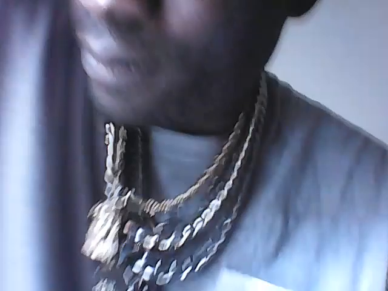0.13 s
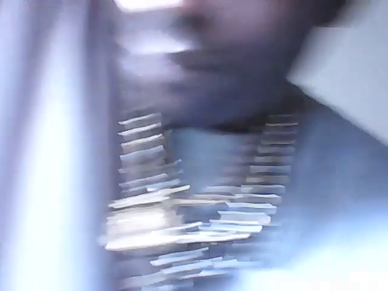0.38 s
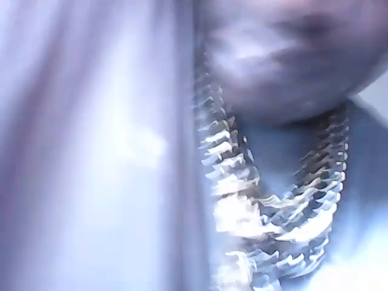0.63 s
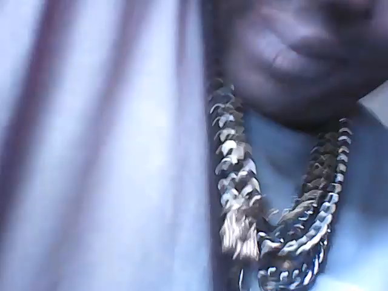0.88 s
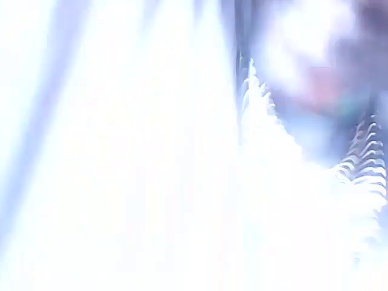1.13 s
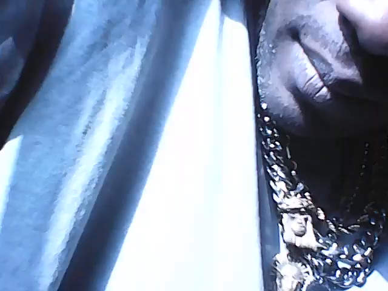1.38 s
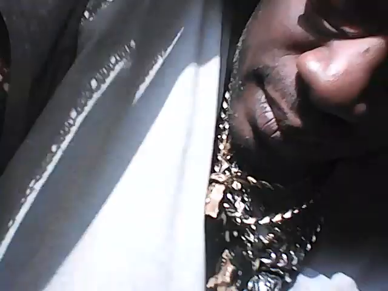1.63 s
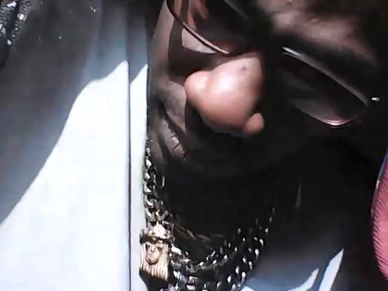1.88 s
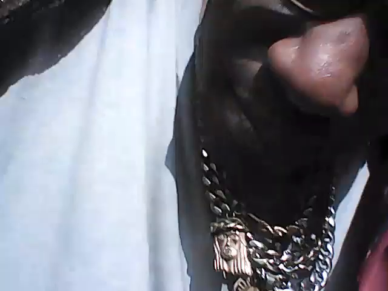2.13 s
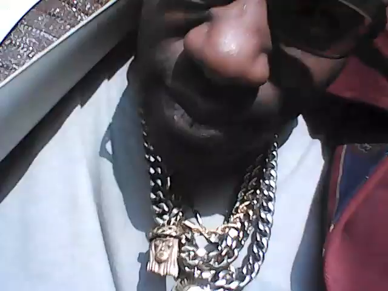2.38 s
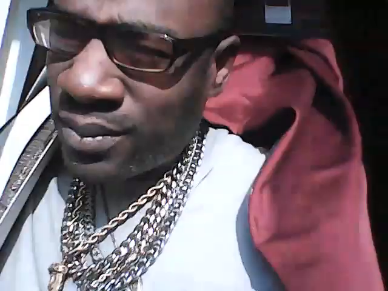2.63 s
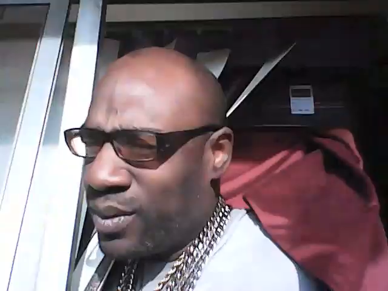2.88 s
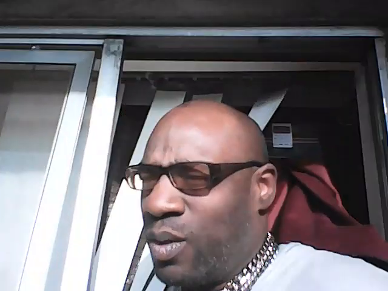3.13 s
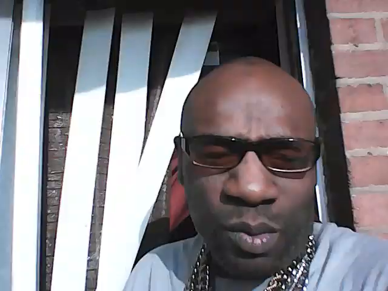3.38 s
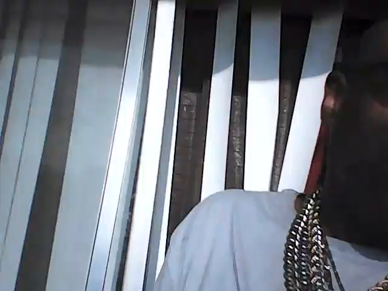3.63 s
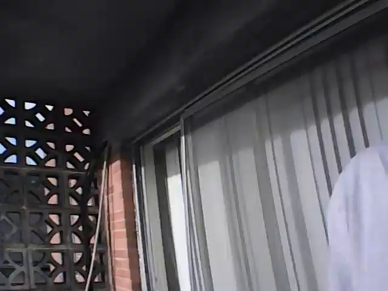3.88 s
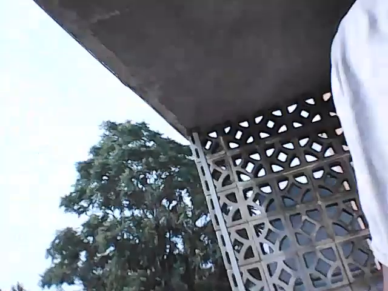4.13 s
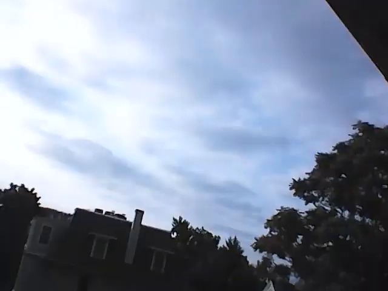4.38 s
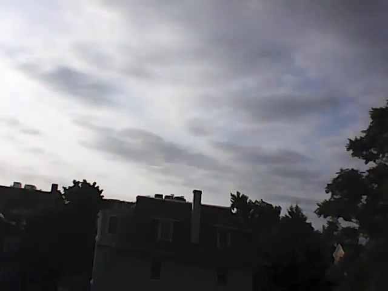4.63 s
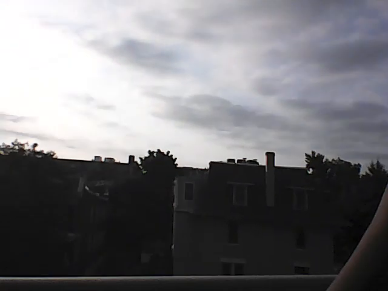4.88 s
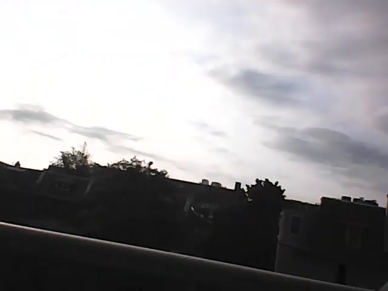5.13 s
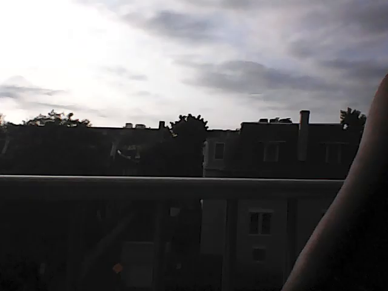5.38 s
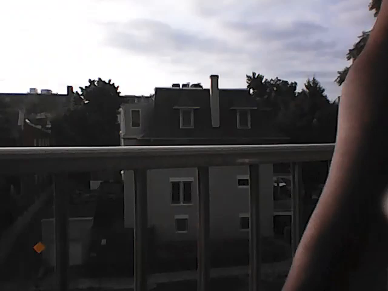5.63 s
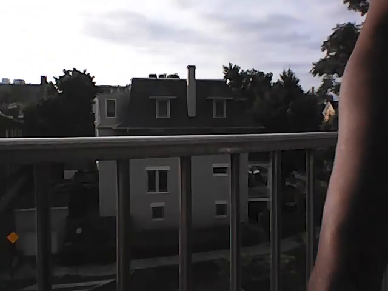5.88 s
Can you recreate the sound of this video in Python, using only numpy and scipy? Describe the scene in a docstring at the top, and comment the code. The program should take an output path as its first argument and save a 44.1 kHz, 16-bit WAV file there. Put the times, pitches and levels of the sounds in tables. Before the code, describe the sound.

A cheap hand-held microphone, nearly mono, carries low hiss and a faint high whine throughout. From 0 s cloth rubs and plastic blinds slide; two hard clacks and a strong handling thump strike at 0.35-0.45 s. Smaller rattles follow, then a dense, bright, scraping clatter of slats swells from about 0.95 to 1.5 s with bumps, thinning by 1.8 s. From 2 s it is nearly quiet: tiny crisp chain ticks cluster around 2.6 s, with soft scuffs, thin wavering hums and a touch more echo around 3 s. Light bumps come at 3.45-3.65 s, scuffing near 3.95 s. A sharp click at 4.13 s leads into a heavy, deep knock at 4.22 s. Quiet fine scuffing follows at 4.5 s. A rough cloth-and-slat bump comes at 5.36 s, then narrow rubbing hums, clacks at 5.7 s, a very hard short clack at 5.79 s, and a last knock at 5.94 s, ending near 6 s.

```python
"""Someone pushes through hanging plastic blinds onto a balcony, holding a small camera; hiss and a faint whine run on.
Up to 2 s cloth and slats brush (rough noise), slats clack (struck modes), thumps come through the hand (sagging sines).
From 2 s fine ticks of neck chains, soft scuffs and thin hums (narrow noise) follow, with more echo around 3 s.
A heavy knock lands near 4.2 s; scuffs return, then hums and hard clacks from 5.1 s to the end. Almost mono."""
import sys
import numpy as np
from scipy import signal
from scipy.fft import rfft, irfft
from scipy.io import wavfile
from scipy.ndimage import uniform_filter1d

SR = 44100
rng = np.random.default_rng(int(sys.argv[2]) if len(sys.argv) > 2 else 0)


def dump(signal):
    """Clip the signal to [-1, 1] and save it as 16-bit WAV at the path in sys.argv[1]."""
    limited = np.clip(np.atleast_2d(signal).T, -1, 1)
    pcm = np.round(limited * 32767).astype(np.int16)
    wavfile.write(sys.argv[1], SR, pcm)


N = 267246


def gain_of(db):
    """Decibels to an amplitude factor."""
    return 10 ** (np.asarray(db) / 20)


def evened(x):
    """Scales to rms 1."""
    return x / np.sqrt(np.mean(x ** 2) + 1e-20)


def read(points, hz):
    """Reads a curve on a log-frequency axis."""
    f, value = np.transpose(points)
    return np.interp(np.log(hz + 1), np.log(f + 1), value)


def add(mix, start_s, sound):
    """Mixes a sound in at a time."""
    part = mix[round(start_s * SR):][:len(sound)]
    part += sound[:len(part)]


def patchy(x, points, patchy_db, size=512):
    """Colours a signal at unchanged overall level and lets narrow bands swell and fade at random."""
    overlap = 3 * size // 4
    hz, t, z = signal.stft(x, SR, nperseg=size, noverlap=overlap)
    colour_db = read(points, hz)
    spots = rng.standard_normal(z.shape[::-1]).T
    spots = uniform_filter1d(spots, size=3, axis=0)
    spots = evened(uniform_filter1d(spots, size=24, axis=1))
    depth_db = np.interp(t, np.arange(N) / SR, patchy_db * np.ones(N))
    power_offset_db = depth_db ** 2 * np.log(10) / 20  # keeps the mean power
    z = z * gain_of(colour_db[:, None] + depth_db * spots - power_offset_db)
    coloured = signal.istft(z, SR, nperseg=size, noverlap=overlap)[1][:N]
    return coloured / np.sqrt(np.mean(gain_of(colour_db) ** 2))


# Hiss spectrum. Each row: frequency in Hz, relative density in dB per Hz.
HISS_SPECTRUM = [(18, -46.5), (30, -36), (101, -5.5), (179, -21.5), (303, -18), (465, -25.5), (1650, -32),
                 (1990, -34.5), (8140, -35.5), (8950, -57), (11600, -70), (19700, -120)]
HISS_DB, HISS_PATCHY_DB = -64, 4.5
WHINE_HZ, WHINE_DB = 8050, -84


def microphone_floor():
    """Slightly uneven hiss and a thin steady whine of the electronics."""
    whine = gain_of(WHINE_DB) * np.sin(2 * np.pi * WHINE_HZ * np.arange(N) / SR)
    hiss = patchy(rng.standard_normal(N), HISS_SPECTRUM, HISS_PATCHY_DB, size=1024)
    return gain_of(HISS_DB) * hiss + whine


# Movements. Each row: time of full strength in s, swell in s, hold in s, base fade in dB per s,
# then full levels in dB of cloth, slats, fine scuff and handling rumble.
MOVEMENTS = [ (0.13, 0.13, 0.13, 101, -48, -33, -41, -54.5),
             (0.239, 0.045, 0.14, 196, -34.5, -32, -35.5, -43),
             (0.353, 0.033, .005, 243, -36, -49, -46.5, -31),
             (0.467, 0.023, 0.03, 155, -29, -35, -45.5, -33),
             (0.635, .02, 0.2, 296, -58, -50.5, -49.5, -74),
             (0.775, 0.035, 0.0073, 305.5, -37.5, -40, -52.5, -41.5),
             (0.819, .01, 0.006, 170, -42, -34.5, -44, -41.5),
             (0.965, 0.1, 0.17, 53.5, -36, -21.5, -31, -33.5),
             (1.264, 0.17, 0.03, 148.5, -30.5, -31.5, -39, -31),
             (1.414, 0.036, 0.003, 120, -33, -48, -40.5, -29.5),
             (1.561, .04, 0.12, 295, -44, -41.5, -47.5, -41),
             (1.741, 0.053, .005, 98, -51.5, -77, -51, -35),
             (1.93, 0.065, 0.052, 198.5, -59, -71, -71.5, -51.5),
             (2.156, .07, 0.018, 123.5, -68.5, -70, -64, -57),
             (2.466, 0.031, .005, 124, -78, -62, -65, -64),
             (2.597, 0.022, 0.016, 84.5, -73.5, -63.5, -59.5, -66.5),
             (2.725, 0.049, 0.095, 150, -55.5, -64.5, -63, -65.5),
             (2.903, 0.019, 0.25, 295.5, -55, -68, -84, -76),
             (3.091, .02, 0.0067, 208, -42.5, -51.5, -76.5, -66),
             (3.172, 0.068, 0.11, 105, -61, -70, -83.5, -78),
             (3.457, 0.12, 0.027, 248.5, -53.5, -63, -50, -50),
             (3.641, 0.13, 0.22, 101.5, -77, -84.5, -96, -53),
             (3.934, 0.051, 0.14, 301.5, -39, -48.5, -46.5, -39),
             (4.134, 0.066, 0.0067, 403.5, -40.5, -42, -33, -22),
             (4.244, 0.023, 0.0042, 245, -45, -49.5, -50.5, -35.5),
             (4.578, 0.4, 0.038, 285, -83, -75, -53.5, -68),
             (4.616, 0.07, 0.068, 346, -74, -67.5, -41.5, -67),
             (4.663, 0.038, 0.021, 240, -47, -51, -55.5, -43),
             (5.017, 0.062, .005, 155.5, -73, -76, -82, -59),
             (5.101, 0.17, 0.06, 196, -64, -49, -67.5, -77),
             (5.372, 0.039, 0.0056, 243.5, -27, -40.5, -44, -26),
             (5.553, 0.016, 0.23, 300, -50.5, -47.5, -55.5, -45),
             (5.764, .015, 0.056, 302, -42.5, -42.5, -49, -34),
             (5.827, 0.014, 0.13, 200, -48, -56, -63.5, -49),
             (5.945, 0.031, 0.062, 348, -39.5, -43.5, -42, -43.5)]
# Factor on the base fade for cloth, slats, scuff and rumble.
FADE_FACTORS = [1.17, 1.033, 1.17, 0.83]
SWELL_DB = 38.5  # rise over the swell time


def movement(column):
    """Level in dB of one layer: the movements' swells, holds and fades add up in power."""
    t = np.arange(0, N + 64, 64) / SR
    power = 1e-12
    for full_s, swell_s, hold_s, fade_db_per_s, *levels_db in MOVEMENTS:
        before_s = np.maximum(full_s - t, 0)
        after_s = np.maximum(t - full_s - abs(hold_s), 0)
        rise_db = SWELL_DB * before_s / max(swell_s, .004)
        fall_db = FADE_FACTORS[column] * fade_db_per_s * after_s
        db = levels_db[column] - rise_db - fall_db
        power = power + gain_of(np.maximum(db, -200)) ** 2
    return np.interp(np.arange(N) / SR, t, 10 * np.log10(power))


def grit(per_s, spread_db, smooth):
    """Dense tiny contacts of unequal size over smooth rubbing."""
    hit = rng.random(N) < per_s / SR
    size = np.minimum(rng.exponential(1, N), 4)
    noise = rng.standard_normal(N)
    bursts = signal.lfilter([1], [1, -.985], hit * gain_of(spread_db * size))
    return noise * (smooth + evened(bursts))


# Spectra of cloth, brushed slats, upper slat modes under hard brushing, fine scuff and handling rumble.
# Each row: frequency in Hz, relative density in dB per Hz.
CLOTH_SPECTRUM = [(250, -23), (420, 3), (700, 5), (1100, 3.5), (1600, -23.5), (2500, -42.5)]
SLIDE_SPECTRUM = [(700, -38.5), (1150, -9.5), (1700, -2), (2300, -5), (2600, -5), (3100, -8.5),
                  (3800, -37.5)]
HARD_SPECTRUM = [(2200, -36), (3000, 3), (4300, 6.5), (5500, -30)]
SCUFF_SPECTRUM = [(3000, -47), (4300, -14.5), (4950, -6), (5500, 1), (6000, -3), (7500, -2), (8400, -11.5),
                  (9200, -39.5)]
RUMBLE_SPECTRUM = [(25, -46.5), (55, -33), (90, -24.5), (130, 2.5), (200, -1.5), (330, -5.5), (550, -45.5)]
HARD_GROWTH, HARD_EVEN_DB = 1.45, -8  # dB per dB of slat level; level where both are equal


def brushing():
    """Cloth drags, slats slide over each other, soles and links scuff, the hand shifts on the housing."""
    cloth_db, slats_db, scuff_db, rumble_db = map(movement, range(len(FADE_FACTORS)))
    # many contacts at once even out; a few leave single bands
    few = np.clip((-22 - slats_db) / 30, .3, 1)
    contacts = evened(grit(400, 2.4, 1.9))
    out = gain_of(cloth_db) * patchy(contacts, CLOTH_SPECTRUM, 5.0 * few, size=1024)
    out += gain_of(slats_db) * patchy(contacts, SLIDE_SPECTRUM, 5.5 * few, size=1024)
    hard_db = HARD_GROWTH * (slats_db - HARD_EVEN_DB) + HARD_EVEN_DB
    out += gain_of(hard_db) * patchy(contacts, HARD_SPECTRUM, 5.5 * few)
    fine = evened(contacts + 1.1 * evened(grit(200, 6.3, 1.0)))
    spotty_db = 7.0 * np.clip((-28 - scuff_db) / 30, .3, 1)
    out += gain_of(scuff_db) * patchy(fine, SCUFF_SPECTRUM, spotty_db)
    shake = patchy(rng.standard_normal(N), RUMBLE_SPECTRUM, 2.5, size=1024)
    # divided by its own short-term level, so the rumble stays even
    local_power = abs(uniform_filter1d(shake ** 2, size=3000))
    shake = shake / np.sqrt(local_power + 1e-9)
    return out, gain_of(rumble_db) * shake


# Echo decay. Each row: frequency in Hz, t60 in s.
WALL_DECAY = [(200, 0.1), (1000, 0.047), (4000, 0.15), (9000, 0.18)]


def walls(x):
    """Sparse echoes of random sign, each band dying at its own speed."""
    taps = np.zeros((2, SR // 2))
    slots = np.arange(300, SR // 2 - 20, 20)
    at = slots + rng.integers(0, 20, (2, len(slots)))
    np.put_along_axis(taps, at, rng.choice([-1., 1.], at.shape), 1)
    hz, t, z = signal.stft(taps, SR, nperseg=256)
    decay_db = -60 * t / read(WALL_DECAY, hz)[:, None]
    tail = signal.istft(z * gain_of(decay_db), SR, nperseg=256)[1]
    return signal.fftconvolve(x[None], tail / np.linalg.norm(tail[0]), axes=1)[:, :N]


# Modes of a struck slat. Each row: nominal frequency in Hz, nominal level in dB, sharpness (higher is narrower).
SLAT_MODES = [(546, -9, 3.9), (750, 7.5, 2.88), (920, 2.5, 1.1), (1112, 14, 1.6), (1423, -0.5, 0.29),
              (1810, 7, 0.6), (2120, 4.5, 0.21), (2614, 2.5, 0.1), (2730, 3, 0.45), (3808, 15.5, 3.8),
              (3800, 11, 0.22), (4740, 0.5, 1.6), (4700, 14.5, 1.7), (5250, 17.5, 2.9), (6240, 26.5, 1.7),
              (7040, 0.5, 0.59)]
# Clacks and ticks. Each row: time in s, early rms level in dB, favoured ring in Hz,
# fall away from that ring in dB per octave, t60 in s.
CLACK_EVENTS = [(.243, -38, 745, 17, 0.071), (.348, -12.5, 1090, 5.5, 0.05), (.441, -12.5, 773, 8, 0.072),
                (.477, -21, 744, 12, 0.057), (.567, -30.5, 760, 22, 0.063), (.613, -29, 7100, 23, 0.048),
                (.653, -41.5, 6500, 18, .04), (.718, -30, 5600, 7, 0.028), (.764, -28, 1750, 7.5, 0.14),
                (.784, -30.5, 724, 26, 0.1), (.827, -30.5, 1730, 8, 0.031), (.851, -36.5, 6060, 8, 0.018),
                (.968, -19.5, 1560, 6.5, 0.13), (1.012, -25, 2130, 5, 0.027), (1.118, -16.5, 2300, 6, 0.14),
                (1.231, -21, 2120, 4.5, 0.12), (1.392, -20.5, 945, 3, 0.1), (1.428, -28, 1090, 9, 0.012),
                (1.452, -23, 1436, 21, 0.038), (1.346, -34, 5440, 10, .025), (1.469, -28, 1310, 0, 0.015),
                (1.544, -33, 1440, 5, 0.017), (1.572, -27, 563, 7, 0.066), (1.615, -31.5, 7000, 13, 0.06),
                (1.698, -36, 870, 9, 0.14), (1.743, -30, 7550, 50, 0.016), (1.762, -41, 684, 6.5, 0.055),
                (1.948, -43.5, 970, 18, 0.061), (1.983, -55.5, 6640, 8, .056),
                (1.875, -59, 7520, 14, 0.021), (1.916, -55.5, 4000, 6.5, .025),
                (2.331, -63, 4000, -0.5, 0.033), (2.444, -47, 2600, 25, 0.085),
                (2.567, -30.5, 5720, 27, 0.01), (2.572, -31.5, 5480, 19, 0.023),
                (2.577, -44, 5500, 11, .03), (2.6, -37.5, 5680, 16, 0.033), (2.621, -36.5, 6560, 25, .051),
                (2.638, -38, 4850, 30, 0.032), (2.69, -52, 6000, 11, 0.023), (2.719, -49.5, 1670, 7, 0.036),
                (2.756, -59, 7000, 12, .03), (2.792, -53, 880, -5, 0.034), (2.901, -54, 890, 12, 0.053),
                (2.982, -51.5, 570, 10.5, 0.077), (3.022, -50.5, 1360, 12, 0.036),
                (3.087, -55, 490, 10, 0.07), (3.285, -55, 6540, 11.5, .04),
                (3.423, -48.5, 6400, 12.5, 0.03), (3.444, -57, 507, 3.5, 0.057),
                (3.479, -51, 6200, 0, .054), (3.526, -54, 6860, -4, 0.031), (3.567, -52, 6500, 8.5, 0.036),
                (4.11, -33, 586, 7, 0.051), (4.129, -19.5, 6130, -3.5, 0.019),
                (4.154, -28, 580, 5.5, 0.027), (4.221, -44.5, 500, 5.5, 0.015),
                (4.246, -55, 900, -1.5, 0.065), (4.267, -54, 4500, 0.5, .02),
                (4.92, -61, 5500, 10.5, 0.059), (5.104, -48.5, 3700, 16.5, 0.18),
                (5.151, -43.5, 2610, 14, .051), (5.354, -23, 1002, 12, 0.11), (5.375, -31, 600, 2.5, 0.031),
                (5.439, -53, 960, -2, .035), (5.568, -34, 900, 10.5, 0.12), (5.648, -41, 1160, 0.5, 0.14),
                (5.705, -27.5, 1060, 16, 0.051), (5.734, -20, 760, 6, 0.047),
                (5.794, -8.5, 1200, 6.5, 0.018), (5.809, -18.5, 490, 14, 0.022),
                (5.938, -23.5, 1120, 9, 0.052), (5.975, -58, 5950, -1, 0.076)]
THIN_HZ, BELOW_SHARE = 480, .9  # slats radiate little below this; fall below the ring against above


def clacks():
    """Each blow is a crack of contact noise that also shakes the damped slat modes, coloured by where it lands."""
    out, t = np.zeros(N), np.arange(SR // 6) / SR
    bins = np.fft.rfftfreq(len(t), 1 / SR)
    hz, db, sharp = np.array(SLAT_MODES).T[:, :, None]
    luck = rng.standard_normal((len(CLACK_EVENTS), 2, len(SLAT_MODES), 1))
    noise = rng.standard_normal((len(CLACK_EVENTS), len(t)))
    for (start_s, level_db, ring_hz, fall_db, t60_s), (tune, share), jolt in zip(CLACK_EVENTS, luck, noise):
        t60_s = max(t60_s, .006)
        octaves = np.log2((bins + 1) / ring_hz)
        away = np.sqrt(octaves ** 2 + 0.14) * np.where(octaves < 0, BELOW_SHARE, 1)
        thin_db = 8.3 * np.maximum(np.log2(THIN_HZ / (bins + 1)), 0)
        colour_db = -fall_db * away - thin_db
        # no two slats are cut or held alike: pitch and share of each mode vary
        detune = (bins - hz * (1 + 0.11 * tune)) / (.03 * hz / sharp + 40)
        modes = (gain_of(db + 2.0 * share) / (1 + 1j * detune)).sum(0)
        # the struck spot favours one ring
        modes += 13.0 / (1 + 1j * (bins - ring_hz) / (0.031 * ring_hz + 25))
        blow = jolt * (1 - np.exp(-t / 0.00066)) * gain_of(-60 * t / t60_s)
        blow[30] += 3.5 * (0.073 / t60_s) ** 0.28  # sharp contact, harder in short blows
        sound = irfft(rfft(blow) * (modes + 2.2) * gain_of(colour_db), len(t))
        # 1 ms of room for the taper, taken back in the start time
        sound = np.roll(sound, 44) * signal.windows.tukey(len(t), .012)
        early_rms = np.sqrt(np.mean(sound[:300] ** 2))
        add(out, start_s - .001, gain_of(level_db) * sound / early_rms)
    return out


# Steps and knocks. Each row: time in s, peak of the envelope in dB, starting pitch in Hz, t60 in s (20 ms at least).
THUMP_EVENTS = [(.349, -42, 426, 0.2), (0.434, -10.5, 325, 0.043), (0.788, -34.5, 316, 0.15),
                (1.01, -15, 200, 0.037), (1.232, -48, 220, .037), (1.562, -29.5, 172, 0.13),
                (1.65, -31.5, 148, .11), (1.743, -21, 116.6, 0.18), (2.131, -37.5, 131.7, 0.29),
                (3.451, -33.5, 501, 0.11), (3.475, -31.5, 407, 0.078), (3.577, -39, 130, 0.15),
                (3.633, -20, 164.6, 0.041), (3.661, -29, 110, .052), (3.761, -33, 210.5, 0.12),
                (4.109, -21, 161, 0.039), (4.126, -16, 251, .03), (4.152, -37, 241, .031),
                (4.215, -5, 121.3, 0.054), (4.243, -13, 113, 0.021), (4.283, -30, 107, .027),
                (4.793, -44, 131.8, .07), (5.353, -22, 147, 0.053), (5.384, -28.5, 190, 0.11),
                (5.738, -25, 108, 0.051), (5.793, -10.5, 145, .04), (5.805, -11, 256, 0.016),
                (5.941, -24, 142, 0.13)]
THUMP_LAG_S, THUMP_RISE_S, THUMP_SAG_PER_S = .004, 0.0028, 2.1


def thumps():
    """A few soft cycles of the housing for each step or knock, sagging in pitch."""
    out, t = np.zeros(N), np.arange(SR // 3) / SR
    for start_s, peak_db, hz, t60_s in THUMP_EVENTS:
        shape = (1 - np.exp(-t / THUMP_RISE_S)) ** 2 * gain_of(-60 * t / max(t60_s, .02))
        turns = hz * np.cumsum(np.exp(-THUMP_SAG_PER_S * t)) / SR
        cycles = -np.sin(2 * np.pi * turns)
        add(out, start_s + THUMP_LAG_S, gain_of(peak_db) * shape / shape.max() * cycles)
    return out


# A loose slat or rail rubbed in one band. Each row: start in s, length in s, centre in Hz,
# rms level in dB before the fade.
HUM_EVENTS = [(0.57, 0.05, 5050, -47.5), (2.445, 0.087, 2040, -56), (2.445, 0.076, 2493, -49.5),
              (2.445, 0.052, 3000, -47), (2.6, 0.14, 3400, -53), (2.6, 0.17, 4600, -56),
              (2.77, .11, 3490, -61), (2.72, 0.042, 1910, -50.5), (2.71, 0.032, 1287, -50),
              (2.798, 0.027, 876, -44.5), (2.906, 0.037, 2190, -53), (2.977, 0.092, 2044, -53),
              (3.02, 0.037, 1370, -50), (3.09, 0.02, 4310, -58), (3.423, 0.084, 1533, -53.5),
              (3.438, 0.068, 2035, -52), (3.474, 0.1, 5100, -58), (4.5, 0.32, 5970, -55.5),
              (5.08, 0.13, 2513, -50.5), (5.363, 0.16, 315, -41), (5.562, 0.28, 1068, -41),
              (5.572, 0.14, 303.5, -45), (5.607, 0.28, 2940, -50)]
HUM_WIDTH_HZ, HUM_WIDTH_SHARE = 45, .025  # bandwidth: fixed part, plus a share of the centre


def hums():
    """Narrow wavering bands: smoothed noise shifted up to each pitch, quick to start and fading."""
    out = np.zeros(N)
    noise = rng.standard_normal((len(HUM_EVENTS), 2, SR // 3))
    for (start_s, length_s, hz, level_db), (a, b) in zip(HUM_EVENTS, noise):
        t = np.arange(min(round(length_s * SR), len(a))) / SR
        r = np.exp(-np.pi * (HUM_WIDTH_HZ + HUM_WIDTH_SHARE * hz) / SR)
        waver = signal.lfilter([1], [1, -2 * r, r ** 2], a + 1j * b)[-len(t):]
        band = evened((waver * np.exp(2j * np.pi * hz * t)).real)
        shape = signal.windows.tukey(len(t), .2) * gain_of(-8.0 * t / length_s)
        add(out, start_s, gain_of(level_db) * shape * band)
    return out


# Drive into the echoes. Each row: time in s, gain in dB.
ECHO_DRIVE = [(0, -20), (2.004, -2), (3, 16.5), (3.998, 9), (6.06, 1.5)]


def scene():
    """Airborne sounds echo, handling sounds do not; almost mono, with a faint spread of echo, rumble and hiss."""
    slide, rumble = brushing()
    hits = clacks() + hums()
    drive = gain_of(np.interp(np.arange(N) / SR, *np.transpose(ECHO_DRIVE)))
    echo, side_echo = walls(drive * (hits + 0.9 * slide))
    mid = slide + hits + gain_of(-16) * echo + rumble + thumps() + microphone_floor()
    # faint low-level left-right spread
    side = gain_of(-29) * side_echo
    side += gain_of(-48.5) * np.roll(rumble, 90)  # 2 ms late
    side += gain_of(-14) * microphone_floor()
    return np.array([mid + side, mid - side])


def record(dry):
    """Soft overload, then a gentle roll-off and a steep band edge."""
    held = 1.046 * np.tanh(dry / 1.474)
    gentle = signal.firwin(41, 8500, fs=SR)
    steep = signal.firwin(401, 9000, window=("kaiser", 9), fs=SR)
    rolled = signal.oaconvolve(held, gentle[None], "same")
    return signal.oaconvolve(rolled, steep[None], "same")


dry = scene()
out = record(dry)
dump(out)
```